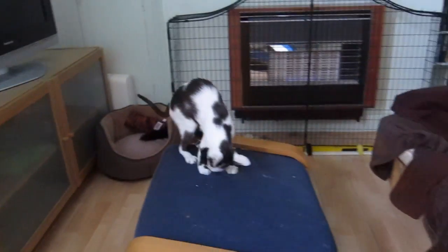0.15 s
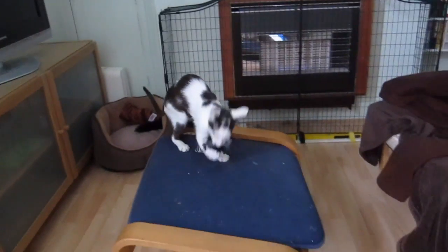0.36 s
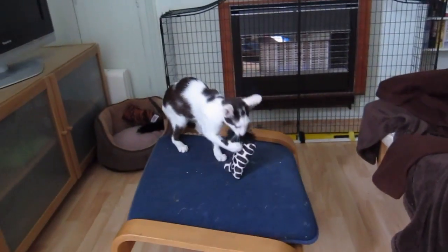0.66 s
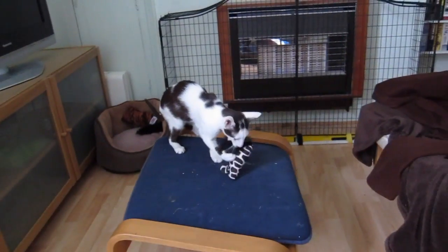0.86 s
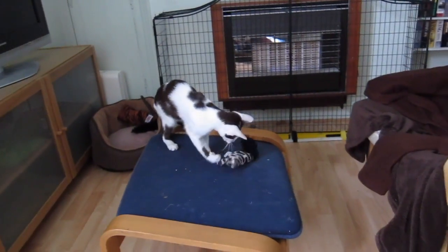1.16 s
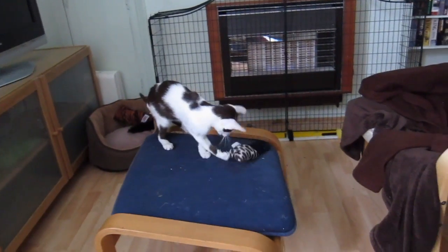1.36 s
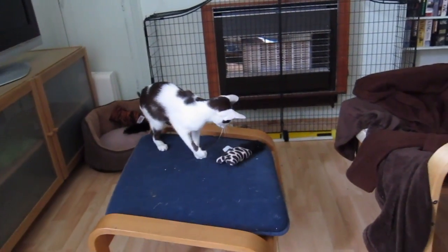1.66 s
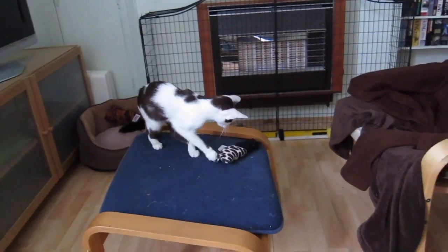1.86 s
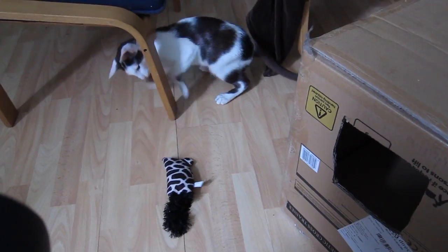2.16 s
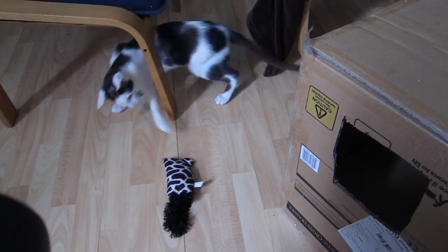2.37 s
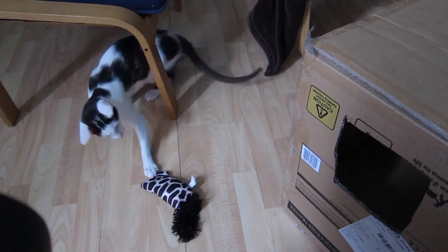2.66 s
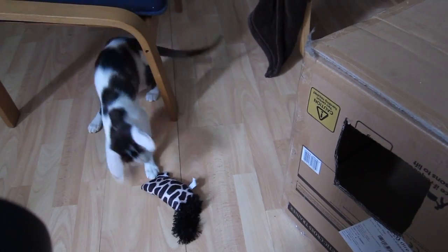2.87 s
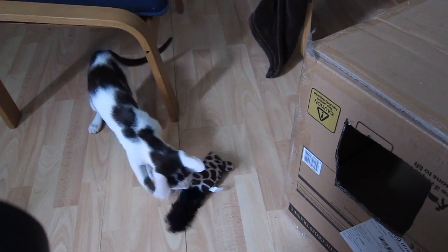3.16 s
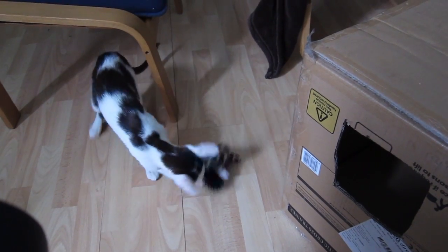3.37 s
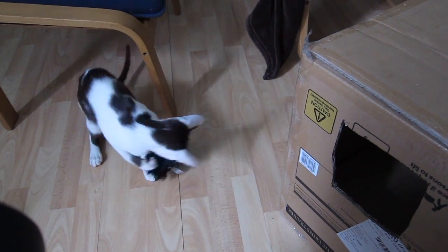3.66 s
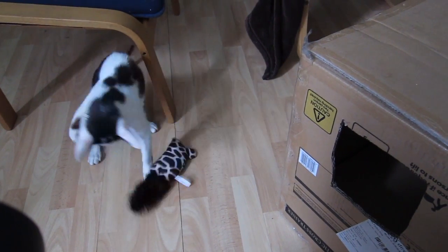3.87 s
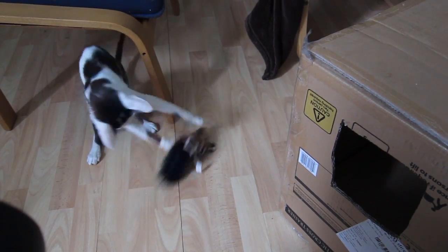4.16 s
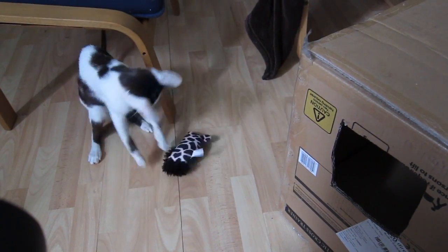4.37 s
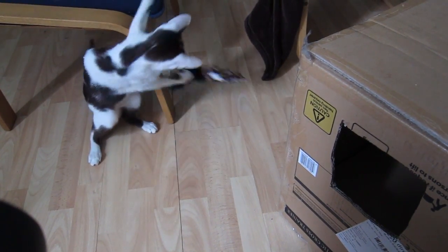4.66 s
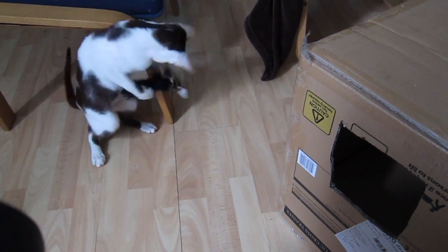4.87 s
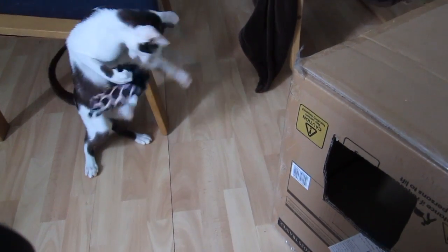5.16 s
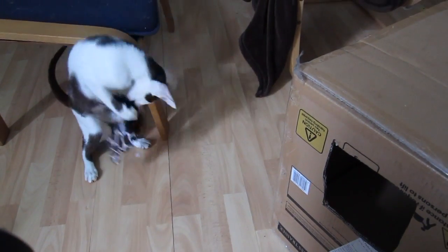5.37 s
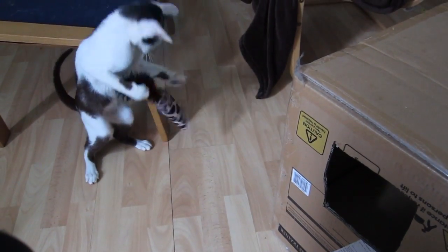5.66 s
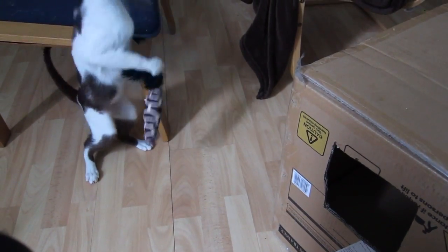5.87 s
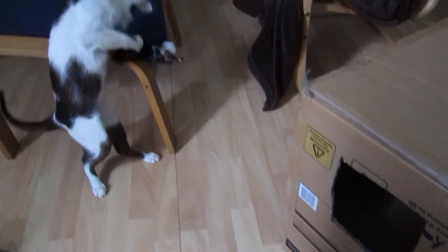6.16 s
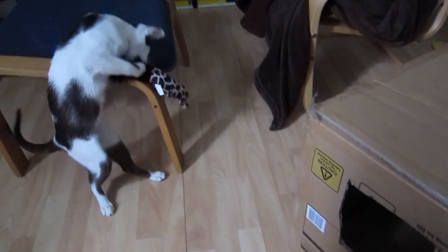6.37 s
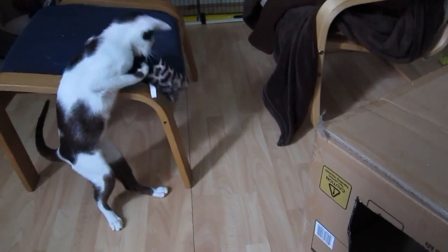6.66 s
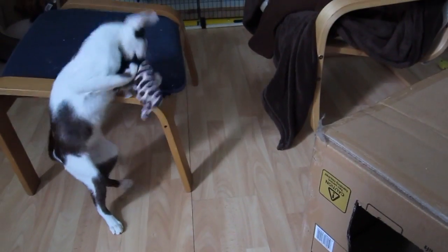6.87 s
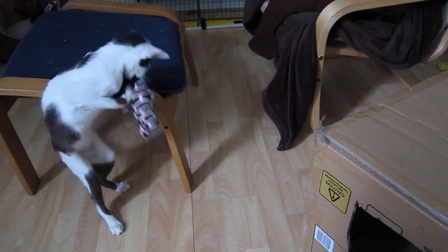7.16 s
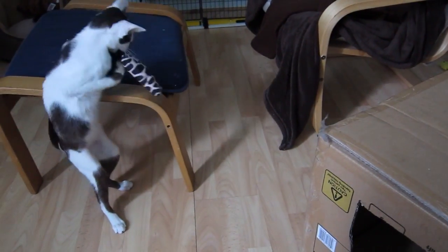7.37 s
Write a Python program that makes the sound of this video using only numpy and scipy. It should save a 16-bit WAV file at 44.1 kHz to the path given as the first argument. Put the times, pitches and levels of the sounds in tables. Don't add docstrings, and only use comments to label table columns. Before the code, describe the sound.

Crinkling, snapping toy film and rubbing cloth with light wooden thuds and claw ticks as a kitten bats a plaything about indoors.

```python
import sys
import numpy as np
from scipy import signal
from scipy.fft import rfft, irfft, next_fast_len
from scipy.io import wavfile
from scipy.ndimage import map_coordinates

SR = 44100
rng = np.random.default_rng(int(sys.argv[2]) if len(sys.argv) > 2 else 0)


def digitize_waveform(pressure):
    field = np.atleast_2d(pressure).T
    bounded = np.clip(field, -1, 1)
    quanta = np.round(bounded * 32767).astype(np.int16)
    wavfile.write(sys.argv[1], SR, quanta)


def linear_from_db(decibels):
    return 10 ** (np.asarray(decibels, float) / 20)


N = 332073

# (frequency [Hz], density [dB per Hz])
FILM_SPECTRUM = [(250, -66.5), (600, -7.5), (1200, -1.5), (2000, 0), (4500, -1.5), (7000, -5.5),
                 (11000, -4), (14000, -15), (15600, -26), (16400, -45)]


def unit(x):
    return x / np.sqrt(np.mean(x ** 2) + 1e-20)


def along(points, hz):
    f, v = np.transpose(points)
    return np.interp(np.log(hz + 1), np.log(f + 1), v)


def wobble(rate):
    knots = rng.standard_normal(int(N * rate / SR) + 4)
    return map_coordinates(knots, [np.arange(N) * rate / SR])


def filtered(x, response):
    m = next_fast_len(N + SR // 2)
    return irfft(rfft(x, m) * response(np.fft.rfftfreq(m, 1 / SR)), m)[..., :N]


def coloured(x, spectrum, lo_hz=0, hi_hz=1e6):
    def shape(f):
        below_hi = 1 / (1 + (f / hi_hz) ** 6)
        below_lo = 1 / (1 + (f / (lo_hz + 1e-3)) ** 6)
        return linear_from_db(along(spectrum, f)) * np.sqrt(below_hi - below_lo + 1e-9)

    power_gain = np.mean(shape(np.linspace(0, SR / 2, 2000)) ** 2)
    return filtered(x, shape) / np.sqrt(power_gain)


def bursts(strikes, life_s):
    return signal.lfilter([1], [1, -np.exp(-1 / (life_s * SR))], strikes)


def background():
    # (frequency [Hz], density [dB per Hz])
    hiss_spectrum = [(20, -9), (60, -0.5), (150, 2), (500, 0.5), (1000, -3), (2500, -4.5), (5000, -13),
                     (7000, -14.5), (10000, -21.5), (15700, -20), (15800, -74)]
    own, common = rng.standard_normal((2, N)), rng.standard_normal(N)
    drift_db = 0.3 * wobble(3)
    return linear_from_db(-56.5 + drift_db) * coloured(own + 0.21 * common, hiss_spectrum)


def tones():
    # (frequency [Hz], level [dB rms], sign)
    partials = [
        (120, -62, 1),
        (8799.2, -74, 1),
        (8823.2, -78, 1),
        (8775.2, -85, -1),
        (8847.2, -86, 1),
        (15734, -91, 1),
    ]
    t = np.arange(N) / SR
    drift = linear_from_db(0.66 * wobble(8))
    return drift * sum(sign * linear_from_db(db) * np.sqrt(2) * np.sin(2 * np.pi * hz * t) for hz, db, sign in partials)


def room(x, near_db, far_db):
    # (frequency [Hz], t60 [s])
    decay_times = [(200, 0.55), (1500, 0.39), (5000, 0.35), (14000, 0.025)]
    # (frequency [Hz], left-right correlation [-])
    coherence = [(200, 0.96), (800, 0.84), (2500, -0.008), (6000, -0.73), (14000, -1.5)]
    out, block = np.zeros((2, N + SR)), SR // 10
    for start in range(0, N, block):
        hz, t, z = signal.stft(rng.standard_normal((2, SR // 4)), SR, nperseg=128)
        tail = signal.istft(z * linear_from_db(-60 * t / along(decay_times, hz)[:, None]), SR, nperseg=128)[1]
        near = rng.standard_normal((2, 400)) * linear_from_db(-60 * np.arange(400) / SR / 0.009)
        after_gap = np.arange(tail.shape[1]) > 150
        tail *= linear_from_db(far_db) / np.linalg.norm(tail[0]) * after_gap
        tail[:, :400] += linear_from_db(near_db) * near / np.linalg.norm(near, axis=1, keepdims=True)
        wet = signal.fftconvolve(x[None, start:start + block], tail, axes=1)
        out[:, start:start + wet.shape[1]] += wet

    def mid_side_gains(f):
        angle = np.arccos(np.clip(along(coherence, f), -1, 1)) / 2
        return np.array([np.cos(angle), np.sin(angle)])

    mid, side = filtered(out[:, :N], mid_side_gains)
    return np.array([mid + side, mid - side])


def landings():
    # (time [s], peak [dB], pitch [Hz])
    paws = [(.026, -35.5, 580), (.046, -35, 485), (.556, -42, 568), (.887, -37.5, 559), (1.099, -53, 1210),
            (3.536, -42.5, 360), (6.274, -40, 323), (6.078, -33.5, 738), (6.094, -35, 692),
            (7.509, -38, 610), (7.521, -38, 800)]
    # (time [s], peak [dB], pitch [Hz])
    toy_drops = [(.324, -21.5, 520), (.339, -26.5, 500), (2.64, -39, 605), (2.675, -41, 560),
                 (2.715, -39, 510), (2.786, -27.5, 643), (4.176, -26.5, 1050), (4.268, -27, 1083),
                 (4.874, -22.5, 1120), (6.8, -32, 1250), (6.898, -30, 1216), (7.029, -36, 790),
                 (7.078, -22, 1215), (7.273, -24.5, 1012), (7.289, -22.5, 1002)]
    # (time [s], peak [dB], pitch [Hz])
    claw_taps = [
        (1.15, -35, 2570),
        (1.185, -36, 2460),
        (6.199, -9.5, 2834),
        (6.216, -22, 1766),
        (6.793, -21.5, 2290),
        (7.272, -10, 1933),
    ]
    # table, ring t60 [s], level of the boards under the ring [dB]
    kinds = ((paws, 0.13, -10.5), (toy_drops, 0.058, -33.5), (claw_taps, 0.03, -40))
    return [(*row, t60, thump_db) for table, t60, thump_db in kinds for row in table]


def knocks():
    out, t = np.zeros(N + SR), np.arange(SR // 4) / SR
    ratios = np.array([[.62], [.8], [1], [1.13], [1.4], [1.7], [2.3]])
    mode_db = [[-12], [-6], [0], [-4], [-8], [-11], [-15]]
    for s, db, hz, t60, thump_db in landings():
        cluster = hz * ratios * (1 + 0.0568 * rng.standard_normal((7, 1)))
        ring = linear_from_db(mode_db) * np.sin(2 * np.pi * cluster * t)
        boards = np.array([[165], [230], [310]]) * (1 + 0.128 * rng.standard_normal((3, 1)))
        thump = linear_from_db(thump_db + 6.5) * np.sin(2 * np.pi * boards * t) * (1 - np.exp(-t / 0.0049))
        band = signal.butter(1, [0.78 * hz, 1.37 * hz], 'band', fs=SR)
        puff = linear_from_db(-6) * unit(signal.lfilter(*band, rng.standard_normal(len(t))))
        fade = linear_from_db(db - 7 - 60 * t / max(t60, .01)) * (1 - np.exp(-t / 0.0015))
        out[round((s + .002) * SR):][:len(t)] += fade * (ring.sum(0) + thump.sum(0) + puff)
    return out[:N]


def moves():
    # (time [s], crackle [dB], bright [dB], release t60 [s])
    pounces = [(.319, -47.5, -5, 0.7), (.551, -51, 2, 0.024), (.629, -54, -2, 0.14), (.668, -55.5, 5, 0.25),
               (1.105, -51, -13, 0.41), (1.333, -48.5, -11, 0.45), (3.731, -58, -15, 0.32),
               (4.177, -37.5, 0, 0.16), (4.518, -50, 3.5, 0.17), (4.827, -49, -4, 0.12),
               (6.094, -38.5, 5, 0.14), (6.9, -45.5, -3, 0.32), (7.273, -34.5, -3, 0.17),
               (7.509, -48, -5, 0.13)]
    # (time [s], crackle [dB], bright [dB], release t60 [s])
    swipes = [(.001, -47, -23, 0.26), (1.536, -50, -6, 0.22), (2.309, -78, 13, 0.13),
              (2.523, -45.5, -3, 0.27), (2.698, -53, -25, 0.84), (2.787, -39, -19, 0.16),
              (3.041, -46.5, -2, 0.23), (3.943, -47, 1, 0.1), (4.266, -27, -5, 0.15),
              (4.278, -43.5, -10.5, 1), (4.871, -32, -9.5, 0.45), (5.058, -65, 14, 0.023),
              (6.189, -34, 5, 0.064), (6.21, -34.5, -5, 0.3), (6.748, -64, 17, .065),
              (6.788, -27.5, -3, 0.024), (6.796, -30.5, -7.5, 0.21), (7.012, -35.5, 0, 0.12),
              (7.076, -33, 0.5, 0.074)]
    # (time [s], crackle [dB], bright [dB], hold [s])
    dragged = [
        (3.594, -56, -11, 0.057),
        (4.87, -24, -5, 0.059),
        (7.059, -38.5, -5, 0.069),
        (7.198, -33.5, -6, 0.063),
    ]
    # (time [s], crackle [dB], hold
    # [s])
    scuffed = [
        (0.317, -70, 0.049),
        (0.893, -79, 0.076),
        (1.726, -76, 0.27),
        (2.523, -73, .05),
        (2.627, -79, .14),
        (6.27, -68, 0.039),
        (7.27, -71, 0.025),
        (7.472, -62, 0.021),
    ]
    # (time [s], crackle [dB], hold [s])
    whisked = [
        (2.016, -52, .048),
        (2.708, -39, .02),
        (2.796, -49, 0.061),
        (3.31, -51, 0.036),
        (6.748, -57, .02),
    ]
    hold_share = 0.15
    quick = [(s, db, bright_db, dull_db, hold_share * t60, t60)
             for table, dull_db in ((pounces, 2.5), (swipes, -0.5))
             for s, db, bright_db, t60 in table]
    # bright and dull over the crackle [dB], then release t60 [s]
    drags = [(s, db, bright_db, -9, hold, 0.1) for s, db, bright_db, hold in dragged]
    whisks = [(s, db, -35, -34, hold, 0.1) for s, db, hold in whisked]
    scuffs = [(s, db, -52, 21, hold, 0.5) for s, db, hold in scuffed]
    return quick + drags + whisks + scuffs


def grabs():
    out, t = np.zeros((4, N + SR)), np.arange(SR // 2) / SR
    bite = 1 - np.exp(-t / .0006)
    lag_s = 0.0021
    for s, db, bright_db, dull_db, hold, t60 in moves():
        grip = bite * linear_from_db(db - 60 * np.maximum(t - hold, 0) / max(t60, .02))
        bands = linear_from_db([[1.44 * dull_db - 19], [dull_db], [0], [bright_db]])
        out[:, round((s + lag_s) * SR):][:, :len(t)] += grip * bands
    return out[:, :N]


def crumple():
    # (time [s], crackle [dB])
    idle_crackle = [(0, -40), (.1, -58.5), (1.15, -62), (2.56, -65), (2.7, -55.5), (2.89, -73),
                    (3.189, -54), (4.21, -56.5), (4.38, -77), (4.63, -64), (5.868, -63.5), (6.25, -56.5),
                    (6.58, -55.5), (6.8, -47.5), (7.3, -45), (7.53, -60.5)]
    # (frequency [Hz], density [dB per Hz])
    cloth_spectrum = [(60, -50), (130, -11), (250, 1.5), (500, 0.5), (1000, -0.5), (2000, -6.5),
                      (4000, -16)]
    film_db = np.interp(np.arange(N) / SR, *np.transpose(idle_crackle))
    brushing_db = -65 + 0 * film_db
    idle = np.array([brushing_db, film_db, film_db, film_db - 6.5])
    strikes = (rng.random(N) < 1500 / SR) * linear_from_db(1.5 * rng.exponential(size=N).clip(0, 3))
    gate = (1.56 + unit(bursts(strikes, 0.00031))) * linear_from_db(1.1 * wobble(60))
    grit = unit(gate * rng.standard_normal(N))
    cloth, dull, middle, bright = grabs() + linear_from_db(idle)
    film = dull * coloured(grit, FILM_SPECTRUM, hi_hz=2830)
    film += middle * coloured(grit, FILM_SPECTRUM, lo_hz=3600, hi_hz=7800)
    film = linear_from_db(-8.5) * film + bright * coloured(grit, FILM_SPECTRUM, lo_hz=8700)
    rub = unit(linear_from_db(2.9 * wobble(90)) * rng.standard_normal(N))
    return film + cloth * coloured(rub, cloth_spectrum)


def rips():
    # (time [s], length [s], level [dB], threads a second [Hz])
    claw_rips = [
        (4.293, 0.088, -17, 111),
        (4.3723, .05, -25, 62),
        (4.885, 0.046, -17.5, 97),
        (6.905, .06, -25, 75),
        (7.277, 0.037, -22, 150),
    ]
    scatter, fade_db = 0.13, 7
    rows = []
    for s, length, db, rate in claw_rips:
        slip, size, bright = rng.standard_normal(size=(3, 12))
        t = (np.arange(len(slip)) + scatter * slip) / rate
        level_db = db - fade_db * t / length + 2.2 * size - 90 * (t > length)
        rows.append([s + t, level_db, 3 + 4 * bright, 2 + 0 * t])
    return np.hstack(rows)


def buckles():
    # (time [s], level [dB], bright [dB])
    thin = [(.447, -32, 11.5), (.6407, -22, 2.5), (1.4107, -33, -1), (1.5419, -30, 8), (2.5261, -17, 6.5),
            (2.5306, -17.5, 5.5), (2.7034, -25.5, 6.5), (2.7087, -21, 7), (2.797, -16, -2),
            (3.1384, -23, 1), (3.5394, -27, -3), (3.5887, -36, 12.5), (3.6129, -20.5, -8),
            (3.9459, -27.5, 3), (4.1797, -9, -1), (4.2695, -3, -3), (4.2757, -6, 4), (4.4857, -35.5, 15),
            (4.5441, -20, 19), (4.6616, -31.5, 9), (4.8773, -4, 4), (6.528, -40.5, 10), (6.5755, -34, -10),
            (6.6935, -41, 21.5), (6.7688, -23.5, -6), (7.3982, -15.5, 0), (7.5015, -28, -2)]
    # (time [s], level [dB], bright [dB])
    folds = [(.4037, -30, 13.5), (.4944, -30.5, 2), (1.3513, -35, 10.5), (1.5943, -28.5, -11),
             (2.5686, -14, -9), (2.7914, -20.5, 11), (3.682, -44, 17), (3.8232, -31, 1), (4.2073, -33, 22),
             (4.3329, -9, -13), (4.4166, -18.5, -4), (4.4752, -38, 1), (4.6551, -27, -10),
             (4.9788, -17.5, 7), (5.246, -29.5, 0), (5.2799, -25.5, -10), (6.0992, -17.5, 5),
             (6.455, -43, -6), (6.507, -33, -6), (6.118, -25, 10), (6.2028, -14.5, 11), (6.2248, -10, -3),
             (6.7931, -14, 0), (6.9403, -24, 15.5), (7.1898, -17.5, -8)]
    # (time [s], level [dB], bright [dB])
    creases = [(.117, -31.5, 1.5), (.3255, -22, -10), (.6779, -28.5, 16.5), (1.5764, -40, -14.5),
               (3.046, -24.5, 3), (3.0593, -23, 5.5), (3.0914, -23.5, 3), (3.1907, -35, 22.5),
               (3.6563, -34, 8), (3.9528, -19.5, 11), (4.2355, -19.5, 4), (4.5023, -44, -9),
               (4.5211, -22.5, 5), (4.5326, -37, 18), (4.5376, -41, 19), (4.8509, -35, 10),
               (6.282, -24.5, 10), (6.3505, -25, 9), (6.54, -33, 8), (6.6577, -33.5, 4),
               (6.6817, -34.5, 12), (6.8982, -22.5, 3), (6.9305, -20, -15)]
    # (time [s], level [dB], bright [dB])
    plucks = [(.3035, -36, -20), (.3541, -31, 3), (.5661, -33.5, 7.5), (.8071, -38.5, 1), (.9636, -34, 9),
              (1.112, -36, 5), (1.5487, -38, -15), (1.6778, -38, -8), (1.9739, -47, 20.5),
              (3.2066, -35.5, 11), (3.7429, -29.5, 8.5), (3.8114, -30.5, -4), (6.0795, -34.5, -18),
              (6.3979, -30.5, -11), (7.2784, -27, -8), (7.2874, -27, -14), (7.5079, -26.5, -6.5),
              (7.516, -33, 17)]
    # table, low part over its middle [dB]
    kinds = ((thin, -20), (folds, -6.5), (creases, 3), (plucks, 9.5))
    rows = np.array([(*row, dull_db) for table, dull_db in kinds for row in table])
    when, size, bright, dull = rng.random(size=(4, 400))
    grip_db = 20 * np.log10(grabs()[2][(when * N).astype(int)] + 1e-9)
    shed_db = grip_db + 10 + 11 * np.log(size + 1e-9)
    shed = [when * N / SR, shed_db, 16 * bright - 7, 14 * dull - 11]
    return np.hstack([rows.T, shed, rips()])


def snaps():
    s, db, bright_db, dull_db = buckles()
    stutter = rng.random((len(s), 6))
    times = s[:, None] + (stutter[:, :3] + 0.092) * [0, .003, .006]
    at = np.round(times * SR).astype(int).clip(0, N - 1)
    size = linear_from_db(db[:, None] - stutter[:, 3:] * [0, 8, 14] - [0, 2.5, 5])
    grit = np.tanh(0.86 * rng.standard_normal(N))

    def crack(tilt_db, life_s):
        weights = size * linear_from_db(tilt_db)[:, None]
        return grit * bursts(np.bincount(at.ravel(), weights.ravel(), N), life_s)

    dull = linear_from_db(-4.0) * coloured(crack(dull_db, 0.00031), FILM_SPECTRUM, hi_hz=2960)
    middle = linear_from_db(-4.0) * coloured(crack(0 * db, 0.00049), FILM_SPECTRUM, lo_hz=3760, hi_hz=8040)
    bright = linear_from_db(-0.5) * coloured(crack(bright_db, 0.00035), FILM_SPECTRUM, lo_hz=8500)
    return dull + middle + bright


def scene():
    play = snaps() + crumple() + knocks()
    direct = play * linear_from_db([[.2], [-.2]])
    return direct + room(play, near_db=-4.5, far_db=-10) + background()


def band_limit(x):
    return signal.sosfilt(signal.butter(12, 16000, fs=SR, output="sos"), x)


def record(dry):
    def notch(f, hz, width_hz):
        damping = 1j * f * width_hz
        return 1 - .99 * damping / (hz * hz - f * f + damping)

    def ports(f):
        return notch(f, 8050, 240) * np.array([notch(f, 8150, 2230), notch(f, 8370, 3340)])

    heard = filtered(dry, ports)
    heard = .7 * np.tanh(heard / .7)
    return band_limit(heard + tones())


dry = scene()
out = record(dry)
digitize_waveform(out)
```